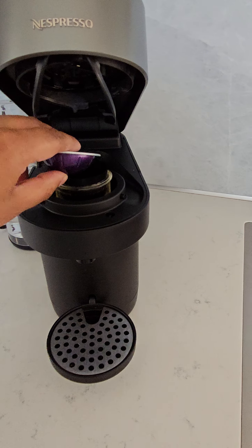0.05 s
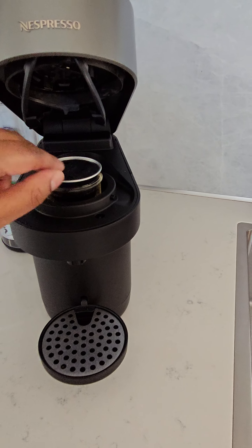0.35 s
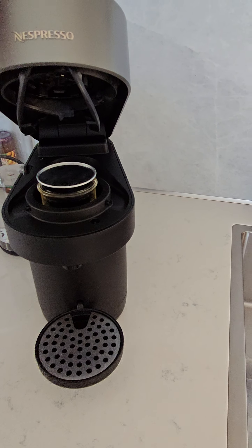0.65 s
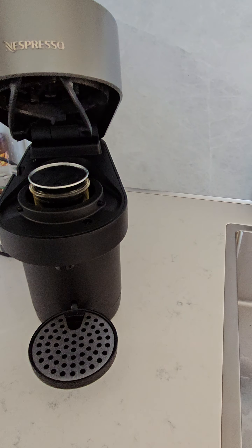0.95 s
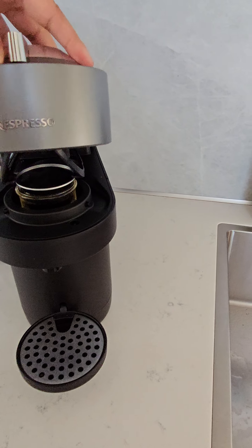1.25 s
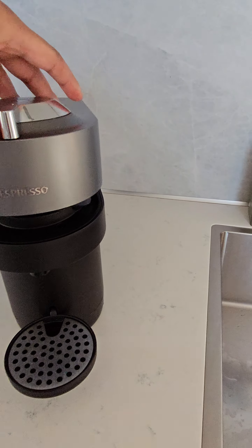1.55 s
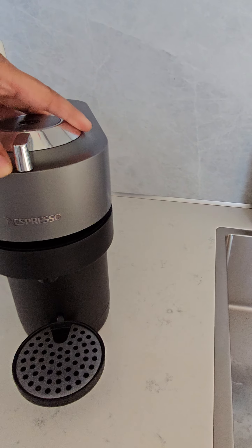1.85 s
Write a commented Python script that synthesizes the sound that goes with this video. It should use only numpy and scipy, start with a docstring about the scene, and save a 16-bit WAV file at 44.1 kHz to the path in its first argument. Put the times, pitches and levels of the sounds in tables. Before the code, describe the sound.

Close, light clatter of a coffee capsule dropping in, followed by a lid's rattle and sharp slam, faint rubbing and a locking clunk.

```python
"""Loading a capsule coffee machine.

Close to the microphone, a capsule drops in, bounces and rings in its cup. The lid rattles down and
slams with a puff of air; under the pressing hand the lock seats with a deep clunk. Fingers rub the
plastic between the clicks. A small hard kitchen with a low hum answers every blow."""
import sys
import numpy as np
from scipy import signal
from scipy.fft import rfft, irfft
from scipy.io import wavfile
from scipy.ndimage import uniform_filter1d

SR = 44100
rng = np.random.default_rng(int(sys.argv[2]) if len(sys.argv) > 2 else 0)


def wav_record(signal):
    """Record a signal, one row per channel, as 16-bit PCM in the file named by sys.argv[1]."""
    frames = np.transpose(np.atleast_2d(signal))
    bounded = np.clip(frames, -1, 1)
    # unit amplitude maps onto the largest positive 16-bit level
    quanta = np.round(bounded * 32767).astype(np.int16)
    wavfile.write(sys.argv[1], SR, quanta)


N = 243431

# resonances of the machine: pitch_hz, gain_db, t60_s
MACHINE_RESONANCES = [(99.6, 20.9, .24), (216, 6.9, .22), (256.5, 11, .19), (295.7, 7.3, 0.12),
                      (471, 3, 0.16), (535, 0.9, 0.17), (676, 3.5, 0.17), (805.6, 1.8, 0.4),
                      (1082, 4, 0.098), (1618, 1.5, 0.19), (1752, 1, 0.42), (2030, 4, 0.29),
                      (2186, 4, 0.069), (2345, 5.35, 0.24), (3190, 9, 0.14), (4200, 3, 0.15),
                      (4630, 6.4, .07), (6281, 6.5, 0.17), (8760, 7, .14)]


def gain_of(db):
    """Decibels to amplitude."""
    return 10 ** (np.asarray(db) / 20)


def unit_rms(x):
    """Scale to rms 1."""
    return x / np.sqrt(np.mean(x ** 2) + 1e-20)


def curve_at(points, hz):
    """Interpolate (freq_hz, value) points on a log frequency axis."""
    freq_hz, value = np.transpose(points)
    return np.interp(np.log(hz + 1), np.log(freq_hz + 1), value)


def add(mix, start_s, sound):
    """Mix in a stereo sound."""
    part = mix[:, round(start_s * SR):][:, :sound.shape[1]]
    part += sound[:, :part.shape[1]]


def panned(db):
    """Stereo gains for a left-minus-right level."""
    return gain_of(np.array([[db], [-db]]) / 2)


def coloured(x, points, size=4096):
    """Minimum-phase filter from (freq_hz, gain_db) points; attacks stay sharp."""
    log_gain = np.log(gain_of(curve_at(points, abs(np.fft.fftfreq(size, 1 / SR)))))
    taps = np.fft.ifft(np.exp(np.conj(signal.hilbert(log_gain)))).real
    return signal.fftconvolve(x, taps[None, :size // 2], axes=1)[:, :x.shape[1]]


def smoothed(x, tau_s):
    """One-pole low-pass, unnormalised."""
    return signal.lfilter([1], [1, -np.exp(-1 / (tau_s * SR))], x)


def wander(size):
    """Random drift of rms 1, smoothed over size samples."""
    return unit_rms(uniform_filter1d(uniform_filter1d(rng.standard_normal(N), size), size))


def noise(size):
    """White stereo noise, alike in the bass, nearly unrelated in the treble."""
    # left-right likeness: freq_hz, correlation
    likeness = [(60, 1), (300, 0.87), (700, 0.47), (1500, 0.4), (4000, 0.36), (14000, 0.096)]
    left, other = rfft(rng.standard_normal((2, size)))
    shared = np.clip(curve_at(likeness, np.fft.rfftfreq(size, 1 / SR)), -1, 1)
    right = shared * left + np.sqrt(1 - shared ** 2) * other
    return irfft(np.array([left, right]), size)


def ringing(drive, modes, size=16384):
    """A part rings in damped modes; high ones reach the two sides out of phase."""
    t = np.arange(size) / SR
    hz, db, t60_s = np.transpose(modes)[:, :, None]
    damping = np.log(1000) / t60_s
    decays = gain_of(db) * 2 * damping / SR * np.exp(-damping * t)
    skew_rad = rng.uniform(-1.6, 1, hz.shape) * np.minimum(hz / 4000, 1)
    response = [(decays * np.cos(2 * np.pi * hz * t + sign * skew_rad)).sum(0) for sign in (1, -1)]
    return signal.fftconvolve(drive, np.array(response), axes=1)[:, :N]


def blows(hits, colour, snap_db, rise_s, t60_s, ring_db, size=8192):
    """Each blow is a snap and a grainy plastic rattle. Returns direct sound and drive for the modes."""
    direct, t = np.zeros((2, N)), np.arange(size) / SR
    attack = 1 - np.exp(-(t / rise_s) ** 2)
    decay = gain_of(-60 * np.maximum(t - rise_s, 0) / t60_s)
    for start_s, level_db, tilt_db_per_oct, pan_db in hits:
        chatter = unit_rms(smoothed(rng.standard_normal(size), tau_s=0.00018))
        grain = unit_rms(gain_of(4 * np.clip(chatter, -2, 2)))
        blow = noise(size) * grain * attack * decay
        blow[:, :1] += gain_of(snap_db)
        # harder contact, more treble
        tilted = [(hz, db + tilt_db_per_oct * np.log2(hz / 1800)) for hz, db in colour]
        add(direct, start_s, gain_of(level_db) * panned(pan_db) * coloured(blow, tilted))
    return np.array([direct, gain_of(ring_db) * direct])


def shoves(rows, modes):
    """A whole part swings once: pressure dips, peaks and dips again, and the part rings on."""
    direct, drive = np.zeros((2, 2, N))
    t = np.arange(N) / SR
    for peak_s, level_db, pitch_hz, ring_db in rows:
        u = np.minimum((np.pi * pitch_hz * (t - peak_s)) ** 2, 50)
        swing = gain_of(level_db) * (1 - 2 * u) * np.exp(-u)
        direct += swing
        drive += gain_of(ring_db) * swing
    return direct + ringing(drive, modes)


def room_tone(air_db=-61, hum_db=-68):
    """Steady room air with a low wavering hum."""
    # spectrum of the air: freq_hz, gain_db
    air_colour = [(20, -7), (45, -2.5), (70, 4), (150, -3), (300, -7.5), (520, -12.5), (750, -24),
                  (1200, -31), (2200, -32), (4000, -38), (8500, -36), (16000, -41.5)]
    t = np.arange(N) / SR
    drift = wander(6000)
    hum = np.sin(2 * np.pi * 59 * t + 2.4 * drift) + 1.4 * np.sin(2 * np.pi * 99 * t - 0.9 * drift)
    return gain_of(air_db) * unit_rms(coloured(noise(N), air_colour)) + gain_of(hum_db) * hum


def kitchen(x, delay_s=0.002, build_s=0.015):
    """Dense reflections from counter, wall and cupboards; each band dies at its own rate."""
    # room decay: freq_hz, t60_s
    decay_times = [(100, 0.17), (300, 0.3), (800, 0.19), (2000, 0.44), (5000, 0.41), (13000, 0.13)]
    hz, t, bands = signal.stft(noise(SR), SR, nperseg=256)
    decay = gain_of(-60 * t / curve_at(decay_times, hz)[:, None])
    tail = signal.istft(bands * decay, SR, nperseg=256)[1]
    tail *= np.clip((np.arange(tail.shape[1]) / SR - delay_s) / build_s, 0, 1)
    colour = [(100, 2.5), (400, 0), (1000, 2), (2000, -7.5), (5000, -6.5), (13000, 3.5)]
    tail = coloured(tail / np.linalg.norm(tail[0]), colour)
    return signal.fftconvolve(x, tail, axes=1)[:, :N]


def hollow(x, decay_s=0.002, size=512):
    """Quick echoes inside the housing add many uneven resonances."""
    echoes = rng.standard_normal((2, size)) * np.exp(-np.arange(size) / (decay_s * SR))
    echoes = coloured(echoes / np.linalg.norm(echoes[0]), [(500, -18.5), (1500, -3.5), (16000, -2.5)])
    return (x + signal.fftconvolve(x, echoes, axes=1)[:, :N]) / np.sqrt(2)


def rub_envelopes(attack_s=0.025, release_s=0.029, ease_db_per_s=-15, waver_db=3.5):
    """Grinds set in, ease off and stop; strokes swell. Returns hiss, scrape and rumble envelopes."""
    # the hand loads the machine; the row at 1.906 s is the slam's scraping, rumbling tail:
    # start_s, length_s, scrape_db, rumble_db
    grinds = [(0.094, 0.087, -66.5, -50), (0.629, .43, -62, -47), (1.45, 0.11, -48.5, -52.5),
              (1.655, 0.09, -55.5, -53), (1.906, 0.16, -57.5, -49), (2.246, 0.447, -57, -52.5),
              (2.741, .33, -60.5, -51.5), (3.128, 0.33, -65, -54.5), (3.429, .24, -59.5, -56),
              (3.994, 0.12, -65.5, -58.5), (4.34, 0.062, -88, -64.5)]
    # fingers slide over the housing: start_s, length_s, level_db
    strokes = [(0.035, 0.2, -58.5), (0.669, 0.13, -48), (0.749, .4, -63), (1.151, 0.24, -58.5),
               (1.385, 0.17, -59), (1.57, 0.079, -50.5), (1.649, 0.081, -61.5), (2.31, 0.35, -66.5),
               (2.727, 0.47, -67.5), (2.954, 0.17, -57.5), (3.38, 0.36, -70), (3.872, 0.06, -65.5),
               (4.0, .25, -52.5)]
    t, envelopes = np.arange(N) / SR, np.zeros((3, N))
    for start_s, length_s, scrape_db, rumble_db in grinds:
        onset = np.clip((t - start_s) / attack_s, 0, 1)
        release = np.clip((start_s + length_s - t) / release_s + 1, 0, 1)
        ease = gain_of(ease_db_per_s * np.clip(t - start_s, 0, length_s))
        hiss_db = scrape_db - 17  # grinding also hisses a little
        envelopes += gain_of([[hiss_db], [scrape_db], [rumble_db]]) * onset * release * ease
    envelopes *= gain_of(waver_db * wander(900))  # uneven grip
    for start_s, length_s, level_db in strokes:
        progress = np.clip((t - start_s) / length_s, 0, 1)
        swell = abs(np.sin(np.pi * progress ** 0.67)) ** 1.8  # peaks before the middle
        envelopes[0] += gain_of(level_db) * swell
    return envelopes


def rubbing(slips_per_s=200, ring_db=-9):
    """Sliding contact: smooth hiss, gritty stick-slip, and the housing rumbling."""
    # sliding fingers: freq_hz, gain_db
    hiss_colour = [(1500, -18.5), (3000, 0), (5000, 2.5), (8000, 3.5), (12000, 5), (16000, 1.5)]
    # grinding plastic: freq_hz, gain_db
    scrape_colour = [(250, -14), (600, 9), (1200, 1.5), (2400, -3), (4000, -5.5), (8000, -19)]
    # rumbling housing: freq_hz, gain_db
    rumble_colour = [(25, -11.5), (60, -2.5), (100, -6), (150, -9), (300, -10.5), (550, -11.5),
                     (1200, -46.5)]
    hiss_env, scrape_env, rumble_env = rub_envelopes()
    slips = rng.random(N) < slips_per_s / SR
    slip_db = 8 * np.minimum(rng.exponential(1, N), 3)
    grit = smoothed(slips * gain_of(slip_db), tau_s=0.0004103)
    hiss = hiss_env * unit_rms(coloured(noise(N) * (1 + 0.083 * grit), hiss_colour))
    scrape = scrape_env * unit_rms(coloured(noise(N) * (1 + 0.2 * grit), scrape_colour))
    rumble = rumble_env * unit_rms(coloured(noise(N), rumble_colour))
    slides = hollow(hiss + gain_of(-2) * scrape + gain_of(-5) * rumble)
    return slides + ringing(gain_of(ring_db) * slides, MACHINE_RESONANCES)


def capsule_drop():
    """The capsule taps, lands and rings; the cup that holds it favours a hollow knock."""
    # taps of its rim: start_s, level_db, tilt_db_per_oct, pan_db
    rim_taps = [(0.122, -50.5, -2.5, 1), (0.183, -26.5, 1, 1.5), (0.1905, -37, -3.5, -2),
                (0.2157, -34, 0.5, -8.5), (0.2215, -53, 1.5, -2), (0.235, -31, 2.5, 2.5)]
    # spectrum of a tap: freq_hz, gain_db
    tap_colour = [(30, -13), (170, 6.5), (430, 14), (1250, 0.5), (1800, 3.5), (4300, -4), (7000, -9.5),
                  (16000, -14)]
    # its dome lands and bounces: peak_s, level_db, pitch_hz, ring_db
    landings = [(0.1838, -34, 1390, 10.5), (0.2164, -27, 1370, 0.5)]
    # capsule resonances: pitch_hz, gain_db, t60_s
    modes = [(305.4, 12, 0.22), (352, -9, 0.22), (500, 9, 0.32), (1065, 1, 0.034), (1310, 15, 0.034),
             (1440, 6, 0.05), (3270, 11, 0.11), (3830, -15, 0.069), (4030, -11, 0.11), (4770, 5, 0.19),
             (7246, -20, 0.093)]
    cup_colour = [(480, 0), (750, -5), (1100, 5.5), (1520, 0), (2400, -9), (3200, -7), (4600, -3.5),
                  (5800, -10), (8000, 0.5)]
    taps, drive = blows(rim_taps, tap_colour, snap_db=6.5, rise_s=0.000098, t60_s=0.074, ring_db=-1.5)
    return coloured(taps + ringing(drive, modes) + shoves(landings, modes), cup_colour)


def air_puff(peak_s=1.7305, rise_s=0.007, fall_s=0.001):
    """The falling lid pushes air at the microphone; it hisses in the gap and sucks back as that shuts."""
    t = np.arange(N) / SR - peak_s
    swell = np.exp(-abs(t) / np.where(t < 0, rise_s, fall_s))
    colour = [(30, 16.5), (150, 16.5), (500, 10.5), (2000, 11.5), (7000, 2), (10000, 5), (16000, -7)]
    hiss = gain_of(-34) * swell * unit_rms(coloured(noise(N), colour))
    push = gain_of(-28) * np.exp(-((t + 0.0032) / 0.0033) ** 2)
    suck = gain_of(-18) * np.exp(-(t / 0.0014) ** 2)
    return panned(-9) * hiss + panned(-6) * (push - suck)


def lid_contacts():
    """Catches, rim and housing all ring the same machine."""
    # hinge and lock catches snap over: start_s, level_db, tilt_db_per_oct, pan_db
    clacks = [(1.256, -21.5, -0.75, 0), (1.306, -24, 1, 3), (1.3105, -15, 1.5, -2.5),
              (1.319, -17, -3, -0.5), (1.327, -10, .7, 2), (1.339, -21, -3.5, 1.5),
              (1.386, -20.5, -3, -0.5), (3.3225, -20.5, -2.7, -2.5)]
    # spectrum of a clack: freq_hz, gain_db
    clack_colour = [(30, -23), (90, -9), (170, -15), (330, -1), (800, 3), (1400, 1), (2500, 1.5), (3500, 1),
                    (4600, 2), (6000, -5), (8600, -3.5), (16000, -5)]
    # rim meets base (slam, rebounds, hand press): start_s, level_db, tilt_db_per_oct, pan_db
    rim_hits = [(1.734, -4.5, 2.5, 0.5), (1.74, -13.5, -1, -3.5), (1.756, -8.5, -0.5, -1),
                (1.764, -13, 4, 9), (1.775, -13, -2, 0), (1.789, -12.5, 2, 1.5), (1.816, -17.5, -1, 0.5),
                (1.828, -19, -3, -1), (3.2465, -25.5, 1.3, -1)]
    # spectrum of a rim hit: freq_hz, gain_db
    rim_colour = [(30, -26), (90, -12.5), (170, -12.5), (260, -8.5), (430, -0.5), (750, -3), (1100, -7),
                  (2100, 3.5), (3000, -7), (4800, -13), (7000, -26), (16000, -22)]
    # plastic under strain: start_s, level_db, tilt_db_per_oct, pan_db
    ticks = [(0.467, -47.5, 3.5, 3.5), (0.644, -44, .5, 0.5), (0.8505, -43, 1.5, -3),
             (1.636, -38, -2.5, -1), (2.058, -48.5, -9, -2), (2.1645, -41, -3.5, 0),
             (2.3515, -49.5, -7.5, 1), (2.617, -49, 1.5, -1), (2.7535, -57, 3, -5), (2.9035, -38, -.5, -1)]
    # spectrum of a tick: freq_hz, gain_db
    tick_colour = [(30, -24), (430, -8), (1000, -0.5), (2500, 1), (7000, -8.5), (16000, -15)]
    # dull housing knocks: start_s, level_db, tilt_db_per_oct, pan_db
    knocks = [(0.655, -48.5, -1.5, -2), (1.004, -48.5, 1.8, -2.5), (2.2825, -40.5, 2.5, 0.5),
              (3.256, -50, -2.5, 1.5), (3.328, -21, 0.9, 0.5), (3.564, -50, -2.5, 1), (4.445, -40, -1, -1),
              (4.483, -31.5, 0.75, .5), (4.6145, -53.5, -5, -0.5), (4.682, -59, -3, 0.5)]
    # spectrum of a knock: freq_hz, gain_db
    knock_colour = [(30, -14.5), (90, 5), (170, -0.5), (260, 10), (450, 15.5), (750, 10), (1250, 5),
                    (1800, -1), (4300, -9), (7000, -15.5), (16000, -22.5)]
    # parts graze; the row at 4.497 s is the dull tail of the knock just before:
    # start_s, level_db, tilt_db_per_oct, pan_db
    scuffs = [(0.752, -50, 1, 8), (0.812, -49, -3.5, 0), (1.514, -36, 0, -3.5), (1.538, -36.5, 0.5, 1),
              (1.565, -36, 0, -2.5), (2.292, -51, -4, 0), (3.9, -57, -2, 1), (3.938, -59.5, 2, 1),
              (4.412, -53, -4, 0.5), (4.497, -54, -5.5, 1)]
    # spectrum of a scuff: freq_hz, gain_db
    scuff_colour = [(30, -1), (90, 10), (430, 18), (800, 11.5), (1250, 7), (1800, 0.5), (4300, -9),
                    (16000, -19.5)]
    direct, drive = (
        blows(clacks, clack_colour, snap_db=7.5, rise_s=0.0009, t60_s=0.06, ring_db=-7)
        + blows(rim_hits, rim_colour, snap_db=12, rise_s=0.0003, t60_s=0.06, ring_db=-5.5)
        + blows(ticks, tick_colour, snap_db=9, rise_s=0.00079, t60_s=0.055, ring_db=-6)
        + blows(knocks, knock_colour, snap_db=11.5, rise_s=0.0003, t60_s=0.12, ring_db=-3.5)
        + blows(scuffs, scuff_colour, snap_db=-20.5, rise_s=0.006, t60_s=0.055, ring_db=-10.5))
    return direct + ringing(drive, MACHINE_RESONANCES)


def lid_swings():
    """First push, rim striking home, lock seating, body rocking on its feet, last settling."""
    # single swings of lid and body: peak_s, level_db, pitch_hz, ring_db
    swings = [(1.2581, -23, 1050, 14), (1.7343, 1, 1950, -2), (3.3282, -6.5, 440, 0.5),
              (3.331, -28.5, 130, -5.5), (4.4839, -20.5, 1280, -5)]
    return shoves(swings, MACHINE_RESONANCES)


def scene(lag_samples=5):
    """Capsule, lid and hand in the kitchen; the machine stands left, so the right side lags."""
    capsule = capsule_drop()
    contacts = lid_contacts()
    swings = lid_swings()
    rubs = rubbing()
    reflections = kitchen(gain_of(-11) * (capsule + swings + rubs) + gain_of(-10) * contacts)
    left, right = capsule + contacts + swings + rubs
    direct = np.array([left, np.pad(right, (lag_samples, 0))[:N]])
    return direct + reflections + air_puff() + room_tone()


def record(dry):
    """Overall tone colour, slightly different at each port; clipping at full scale; band limit."""
    # left port minus right: freq_hz, balance_db
    balance = [(300, 0.5), (1500, 1.5), (3000, -0.5), (6300, -3), (7300, 8), (8800, 2.5), (9800, -3.5),
               (12500, -7.5), (14200, -6), (16000, -5.5)]
    # overall tone colour, with a dip near 10 kHz: freq_hz, gain_db
    tone_colour = [(20, 1), (780, -2), (900, -5.5), (1050, -1.5), (6200, 3), (6900, -1), (8600, 2.5),
                   (9700, -10), (10900, -6), (11900, 1), (16000, -2)]
    ports = [coloured(side[None], [(hz, sign * db / 2) for hz, db in balance])
             for side, sign in zip(dry, (1, -1))]
    clipped = np.clip(coloured(np.vstack(ports), tone_colour), -1, 1)
    lowpass = signal.firwin(511, cutoff=16150, window=("kaiser", 9), fs=SR)
    return signal.oaconvolve(clipped, lowpass[None], "same")


dry = scene()
out = record(dry)
wav_record(out)
```